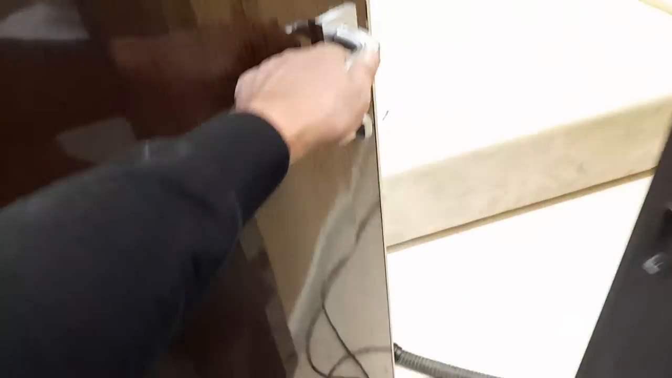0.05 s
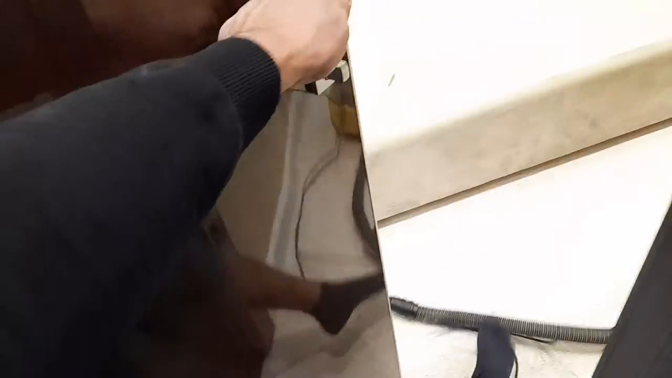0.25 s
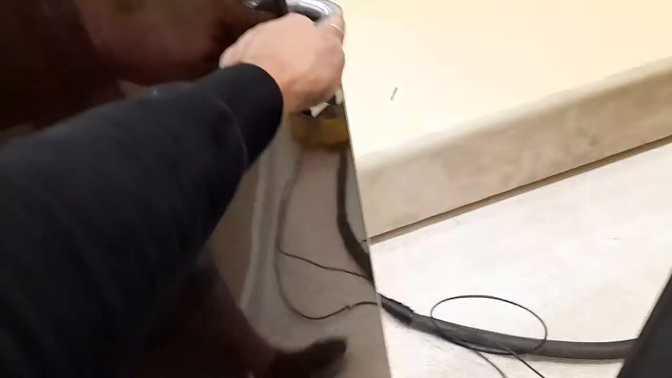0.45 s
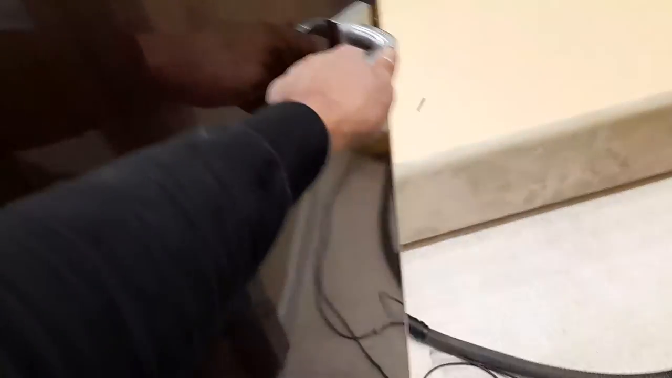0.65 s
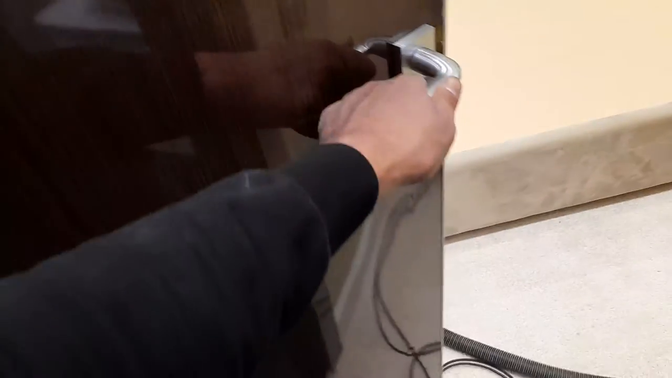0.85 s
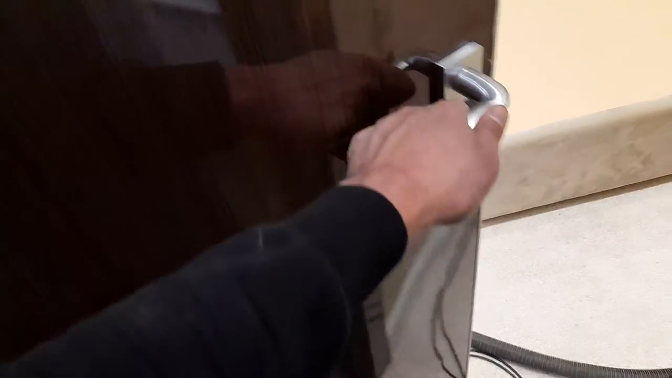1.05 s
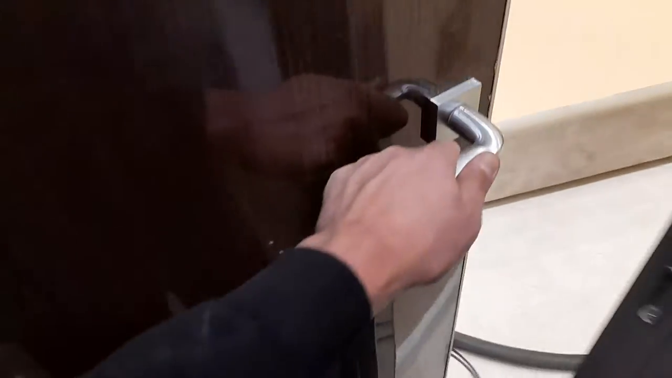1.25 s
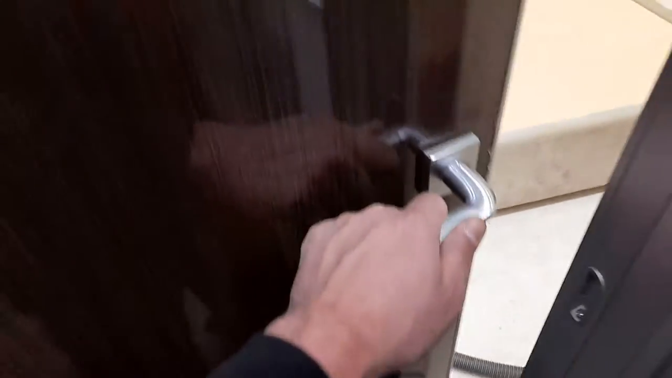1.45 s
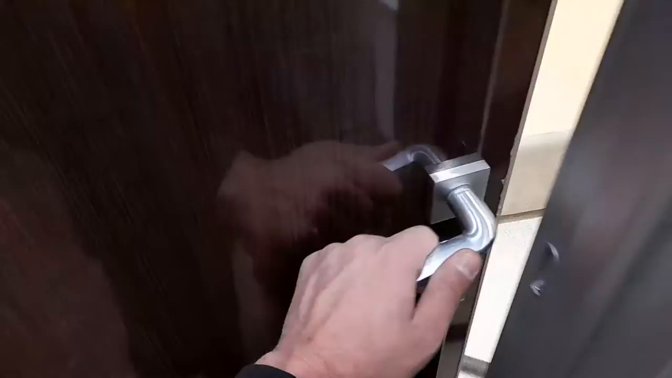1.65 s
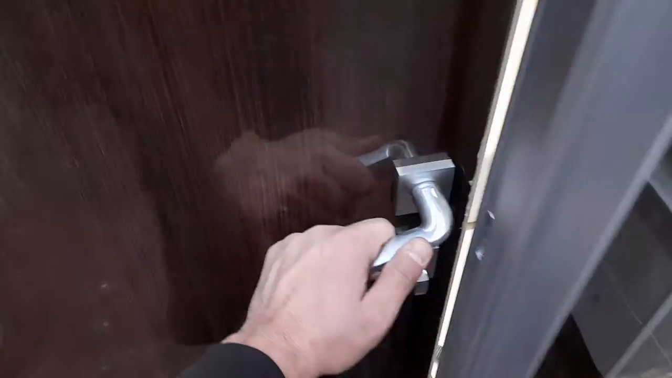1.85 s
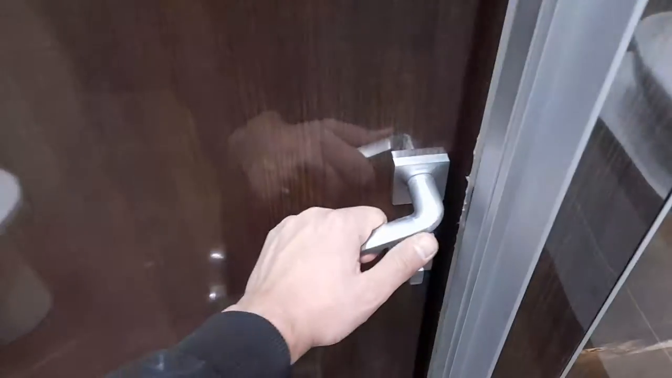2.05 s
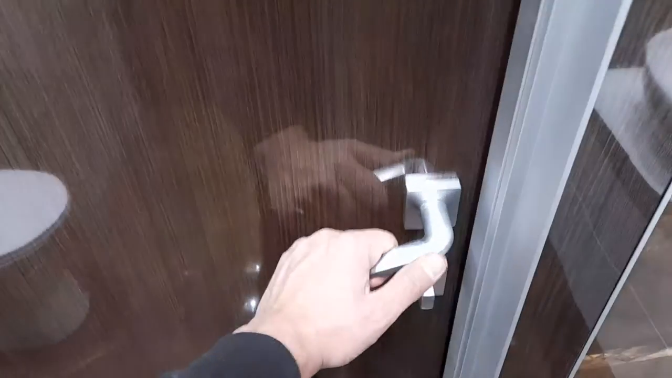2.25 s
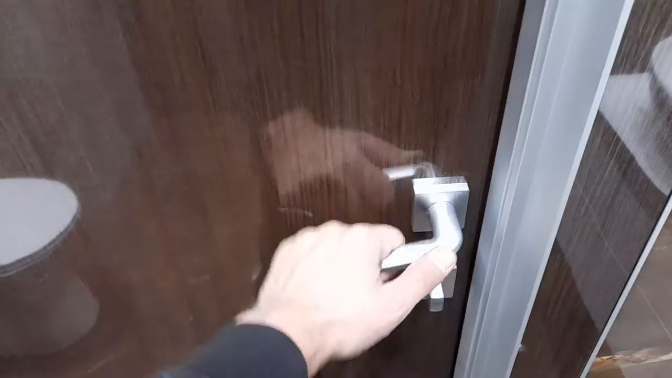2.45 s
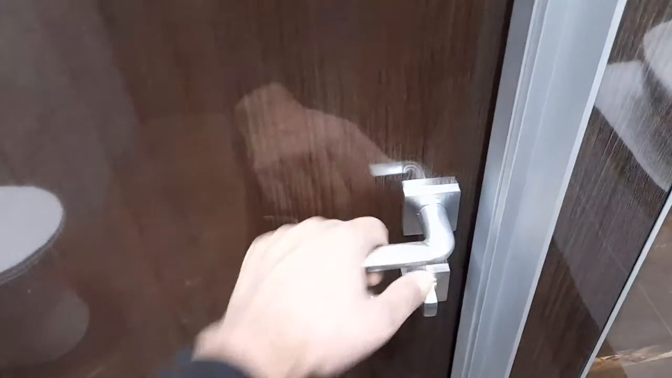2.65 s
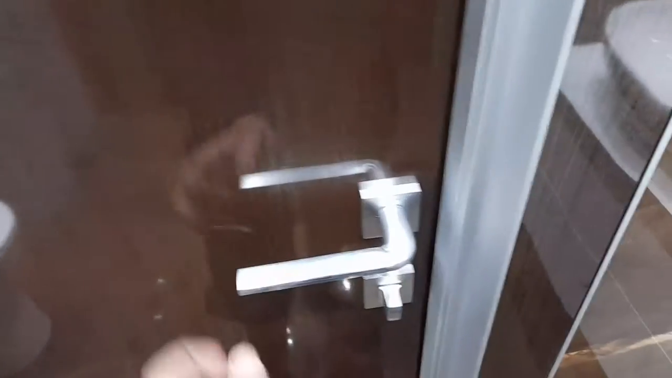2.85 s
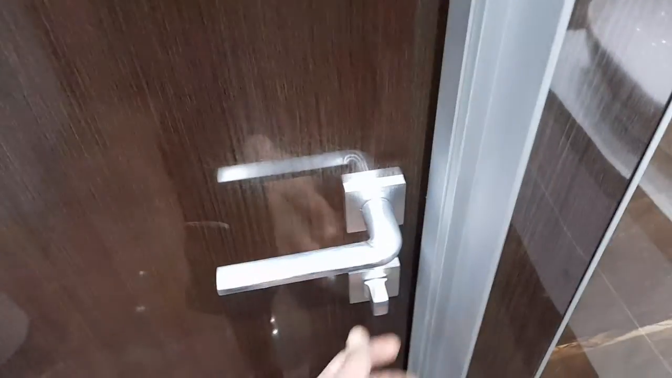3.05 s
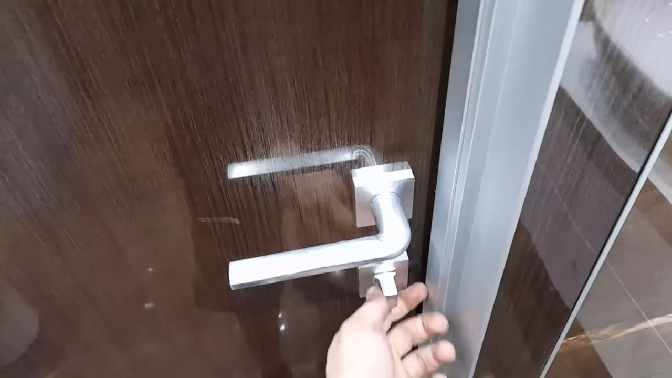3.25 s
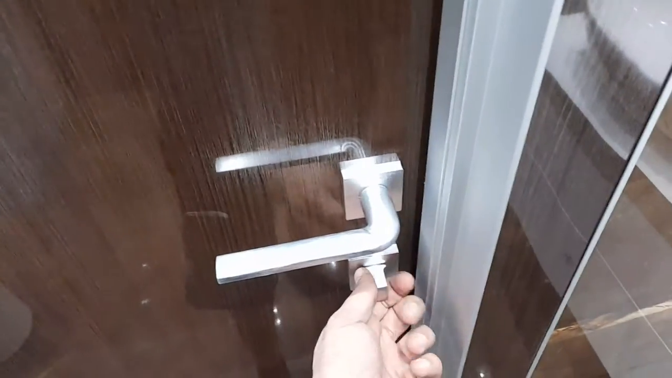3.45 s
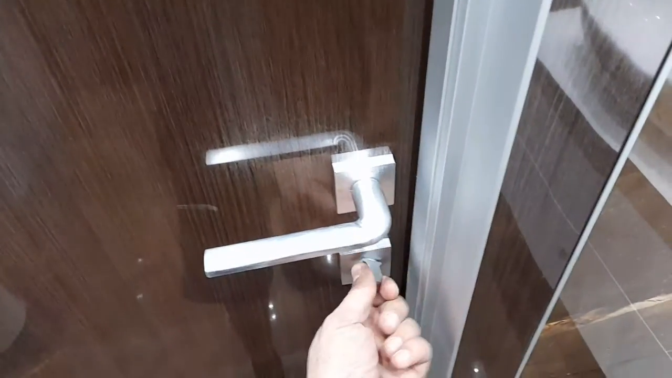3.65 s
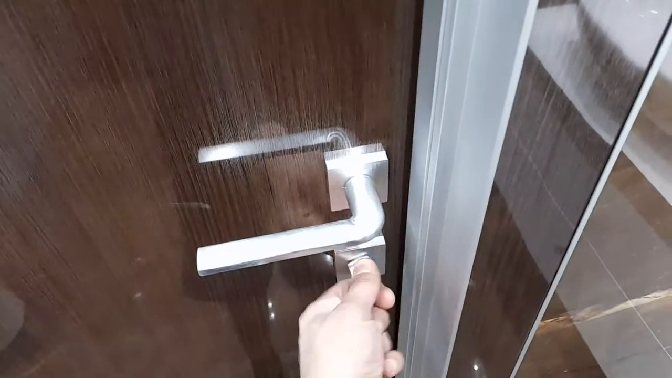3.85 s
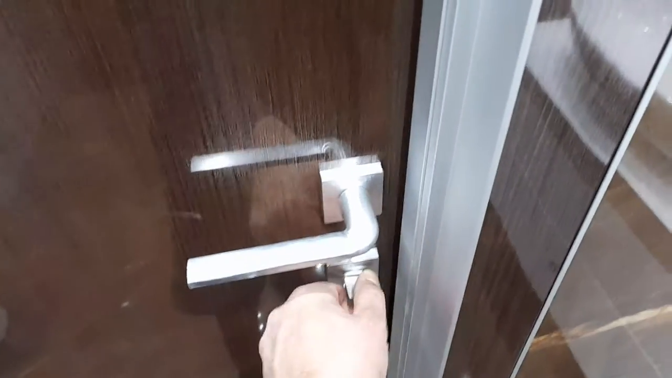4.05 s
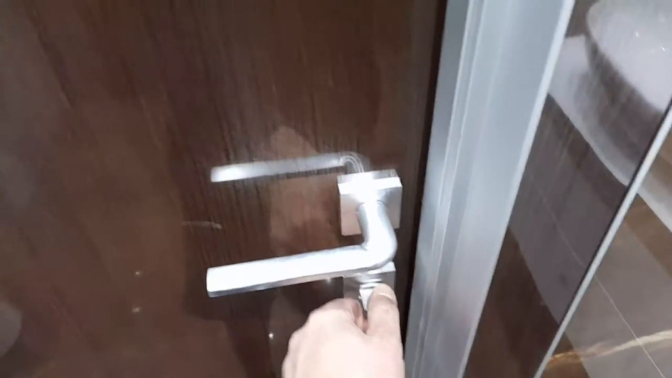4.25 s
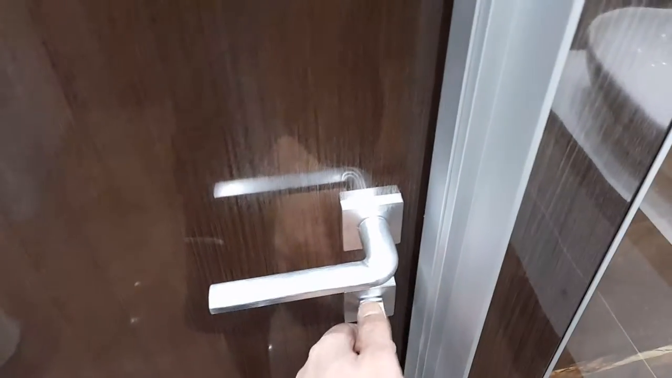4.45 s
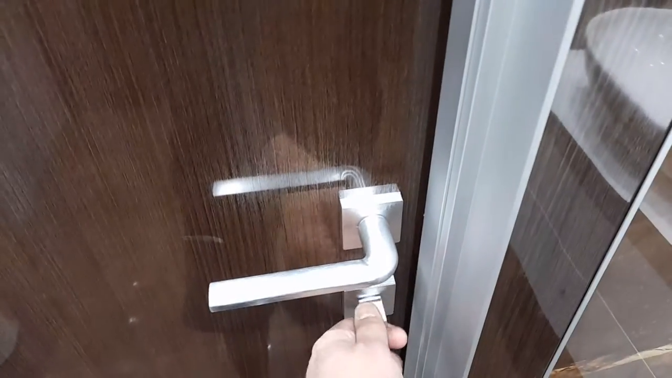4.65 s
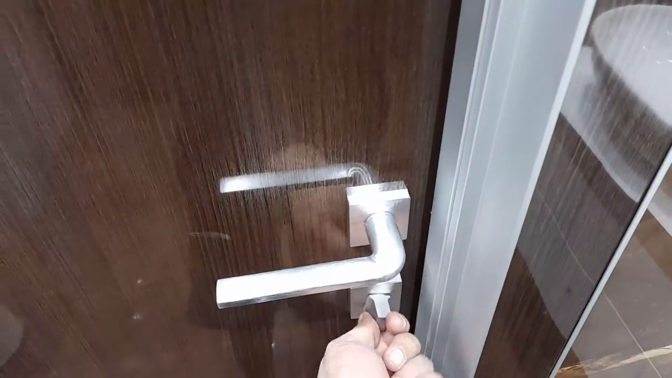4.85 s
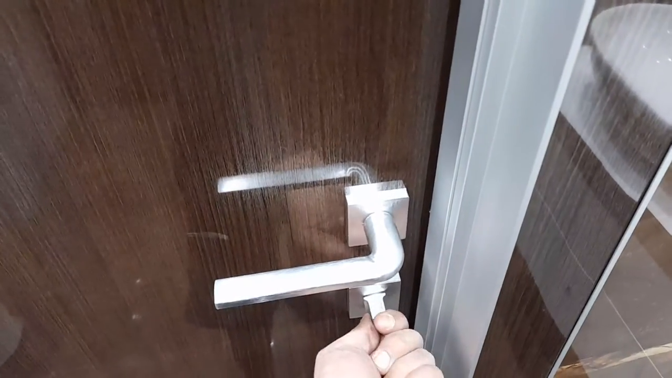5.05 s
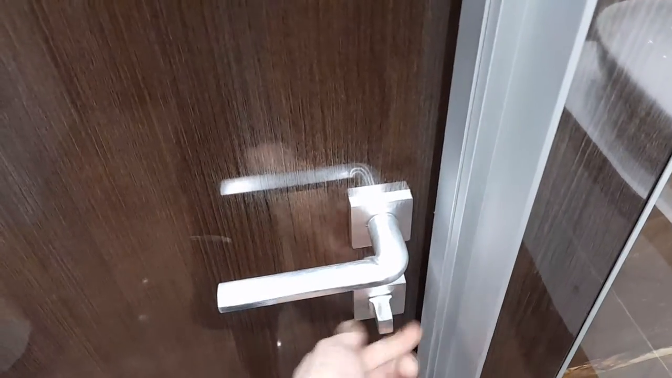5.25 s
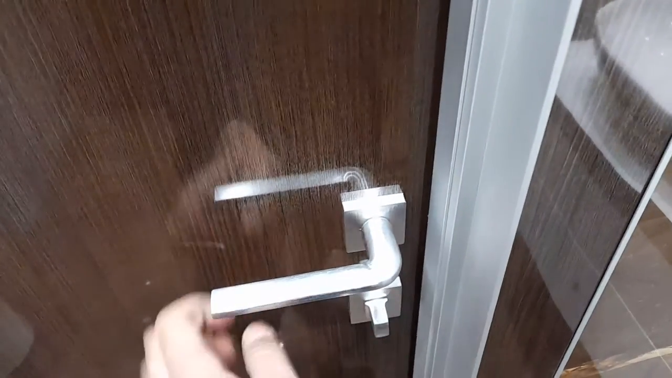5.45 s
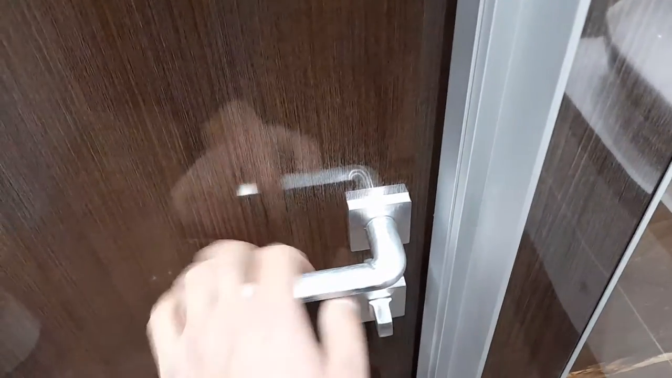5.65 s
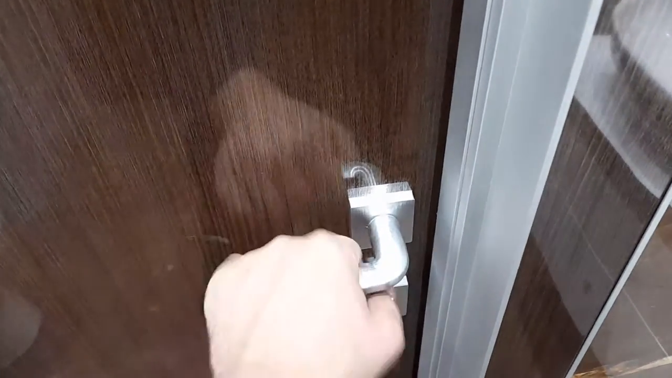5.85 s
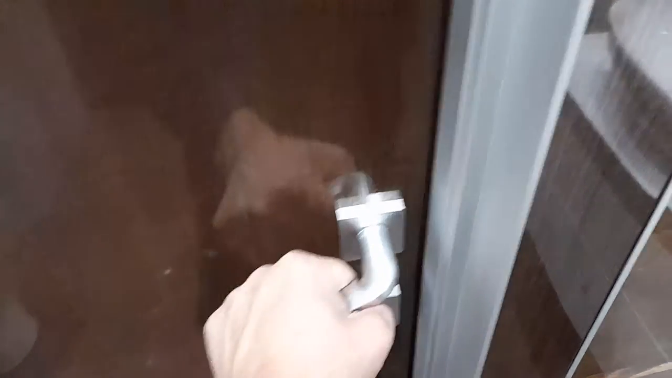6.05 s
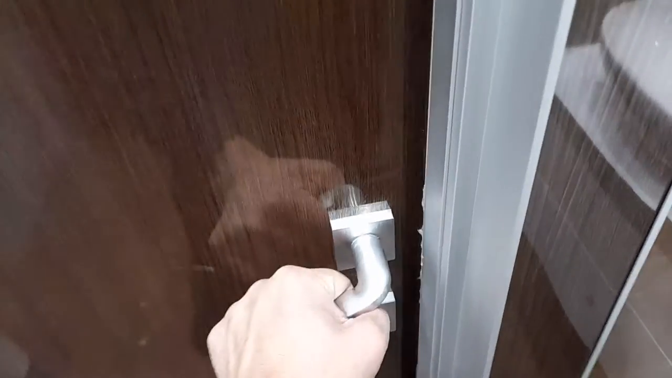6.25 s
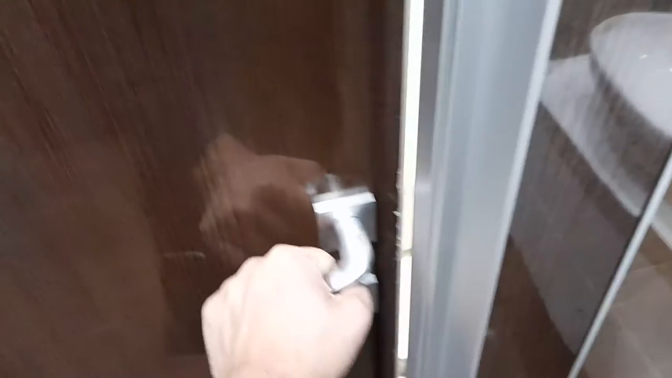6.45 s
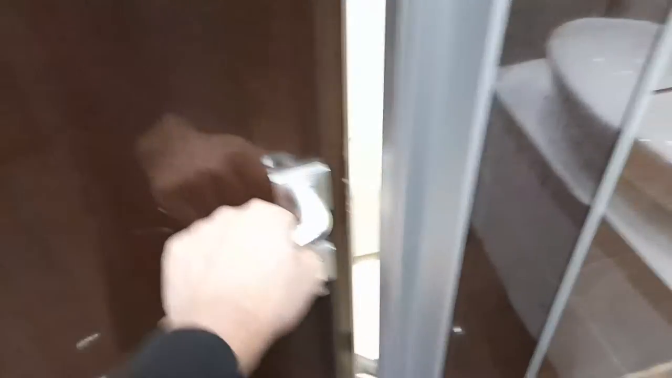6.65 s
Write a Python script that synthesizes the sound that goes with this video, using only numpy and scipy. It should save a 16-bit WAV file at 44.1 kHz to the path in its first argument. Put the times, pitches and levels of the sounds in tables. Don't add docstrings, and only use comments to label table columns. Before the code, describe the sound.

A close stereo microphone hears a wooden door with a metal lever in a small, reverberant, hard-surfaced room with faint hum and hiss. From 0 to 0.4 s there are light metal ticks and skin rubbing on the handle; faint knocks follow around 0.8 and 1.65 s. At about 2.2 s the latch cracks sharply and the door slams with a deep, chesty boom, a low hum and shudder ringing on while the background dulls. Small settling clicks come at 2.9 s. From 3.4 to 3.65 s the thumb-turn lock clacks; a strong double clunk with rattle lands near 3.96 s, a lighter one at 4.36, the hardest snap at 4.72, then a cluster of clicks to 4.93 and one at 5.19. Soft fumbling at 5.5-5.8 s precedes crisp lever clacks at 5.9-6.05 s; the latch frees, and low shudder and handling fade as the door opens.

```python
import sys
import numpy as np
from scipy import signal
from scipy.fft import irfft
from scipy.io import wavfile

SR = 44100
rng = np.random.default_rng(int(sys.argv[2]) if len(sys.argv) > 2 else 0)


def convert_level_to_amplitude(level_db):
    exponent = np.asarray(level_db, float) / 20
    return 10 ** exponent


def master_out(mix):
    frames = np.transpose(np.atleast_2d(mix))
    ceiling = np.clip(frames, -1, 1)
    pcm = np.round(ceiling * 32767).astype(np.int16)
    wavfile.write(sys.argv[1], SR, pcm)


N = 295749

# [f/Hz, level/dB, T60/s]
SLAM_MODES = [(68.7, -15, 0.4), (92, -8, 0.8), (108, -1.5, 0.35), (144.4, -9.5, 0.5), (178, -11, 0.25),
              (220, -19, 0.5), (278.6, -10, 0.35), (319, -26, 0.6), (472, -24, 0.35), (356, -15, 0.2),
              (243.5, -17, 0.4)]
# [f/Hz, shut level/dB, free level/dB, T60/s]
LEAF_MODES = [(64.6, -5.5, -21, 0.45), (99.6, 0.5, 3, 0.17), (111.7, -3, -27, 0.34), (152, -3, -13, 0.18)]
# [f/Hz, shut level/dB, free level/dB, T60/s]
PANEL_MODES = [(193, -13, -5.5, 0.14), (229.5, -9.5, -13, 0.14), (292.5, -6.5, -27, 0.09),
               (315, -7, 3.5, 0.16), (376.5, -5.5, -13, 0.22), (416.5, 6.5, 9, 0.03),
               (482, -16.5, -11.5, 0.56), (528.3, 1, 2.5, 0.099), (599.5, -3.5, -0.5, 0.094),
               (679, -2, -1, 0.032)]
# [f/Hz, level/dB, T60/s]
CASE_MODES = [(805, -7.5, 0.015), (793, -10.5, 0.0079), (980, 2, 0.0084), (1080, -5.5, 0.049),
              (1163, -1.5, 0.011), (1385, -1, 0.02), (1590, -11.5, 0.023)]
# [f/Hz, level/dB, T60/s]
BOLT_MODES = [(1820, 4.5, 0.003), (2235, 3, 0.01), (2600, 5, 0.0037), (3325, 4.5, 0.0041),
              (3850, -6, 0.002)]
# [f/Hz, level/dB, T60/s]
CRACK_MODES = [(4600, 8.16, 0.0013), (5270, 0.72, 0.0069), (6400, 9.6, 0.0015), (7530, 1.87, 0.0016)]
# [f/Hz, level/dB, T60/s]
EDGE_MODES = [(9940, 8.5, 0.0012), (12340, 12, 0.0016), (15000, 11.5, 0.00051)]

# [t/s, case level/dB, hardness/dB, wood level/dB]
SWING = [(0.171, -37.5, -1.5, -45.5), (0.24, -73, 3, -47), (0.349, -56.5, 10, -47), (0.763, -40.5, -1, -40),
         (0.783, -60, 14, -38), (0.89, -44, -17, -44), (0.921, -71, 2, -52), (1.64, -43.5, -10, -39.5),
         (1.646, -42, -19.5, -35), (1.897, -59, -7.5, -51.5), (2.191, -36, -26, -48),
         (2.219, -17.5, -10.5, -24.5)]
# [t/s, case level/dB, hardness/dB, wood level/dB]
SEATED = [(2.254, -54, 21, -23), (2.282, -30, -10, -25), (2.305, -27, -8, -34), (2.345, -37, -26, -36),
          (2.855, -53, -8, -52), (2.913, -41, -8, -50), (2.924, -33, -6, -39), (2.934, -39, -20, -37),
          (2.966, -37, -5, -35.5), (3.23, -43.5, -58, -49), (5.505, -48, -13, -65),
          (5.589, -35.5, -49, -46.5), (5.603, -51.5, 2.5, -43), (5.775, -41, -8.5, -50),
          (5.905, -32, -5, -32), (5.955, -29.5, -6.5, -32.5), (6.051, -25.5, -13, -37),
          (6.083, -33, -42, -41)]
# [t/s, case level/dB, hardness/dB, wood level/dB]
LOCK = [(3.382, -25, -34, -37), (3.435, -29, -38, -44), (3.522, -17, -38, -33.5), (3.552, -20, -10, -31.5),
        (3.645, -24.5, -22, -29.5), (3.944, -25, -17, -35.5), (3.961, -19, -14, -25.5),
        (3.979, -23, -53, -28), (3.998, -35, -26, -37), (4.048, -31.5, -14, -34), (4.089, -57, -5, -33),
        (4.355, -30.5, -66, -45), (4.419, -61, -42, -47.5), (4.659, -23, -30.5, -36.5),
        (4.714, -31, -21, -45), (4.719, -13, -23.5, -32), (4.781, -30, -26, -33), (4.845, -26, -27, -30),
        (4.865, -24, -33, -55), (4.888, -24, -35, -38), (4.933, -39.5, 2.5, -34.5), (5.185, -24, -30, -48),
        (5.219, -58, -14, -42)]
# [t/s, level/dB]
PUSHES = [
    (0.783, -36.5),
    (0.89, -37.5),
    (0.932, -40.5),
    (1.646, -38),
    (4.929, -45),
    (5.121, -50),
    (5.505, -41),
    (5.692, -49),
    (5.775, -39.5),
]

# [t/s, level/dB, f/Hz, width/Hz, T60/s]
CHATTER = [(3.384, -38.5, 1060, 150, 0.16), (3.524, -39, 1170, 203, 0.2), (3.962, -23.5, 1020, 110, 0.14),
           (3.963, -31.5, 2290, 400, 0.13), (3.963, -32.5, 1680, 250, 0.15), (3.964, -31, 3040, 400, 0.08),
           (4.36, -49, 2390, 500, 0.18), (3.556, -38, 2570, 500, 0.069), (3.556, -34.5, 5700, 900, 0.059),
           (3.998, -28, 1030, 150, 0.069), (4.05, -33.5, 1140, 202, 0.2), (4.66, -48, 1050, 146, 0.13),
           (4.721, -29.5, 1240, 130, 0.23), (4.725, -33.5, 2290, 250, 0.19), (4.722, -33, 2970, 500, 0.11),
           (3.645, -29, 1700, 700, 0.03), (5.955, -34, 2600, 900, 0.052), (5.65, -57.5, 5800, 1500, .3),
           (2.97, -47.5, 4660, 1500, 0.17), (4.765, -31.5, 1310, 150, 0.092),
           (4.811, -38, 1170, 150, 0.087), (4.86, -27.5, 895, 250, 0.048), (4.885, -36, 1280, 250, 0.038),
           (5.186, -30.5, 1080, 160, 0.1), (5.185, -38.5, 1390, 250, 0.16),
           (5.186, -36.5, 2900, 800, 0.079), (5.186, -50, 1920, 400, 0.067),
           (5.186, -56, 4100, 1200, 0.047), (6.052, -34, 2600, 700, 0.083), (6.052, -37, 4460, 400, 0.077),
           (5.905, -38.5, 3360, 900, 0.041), (0.889, -43, 840, 300, 0.031), (1.643, -59, 5200, 1500, 0.089),
           (2.222, -39, 1090, 120, 0.091)]
# [t/s, level/dB, f/Hz, width/Hz, T60/s]
MORE_CHATTER = [(2.221, -29, 4200, 1400, 0.07), (2.255, -34, 4300, 1400, 0.15), (2.306, -38, 4300, 1200, 0.25),
                (2.255, -38, 7100, 900, 0.1), (2.26, -35, 1750, 500, 0.2), (2.914, -40, 4400, 1600, 0.015),
                (2.922, -40, 2300, 500, 0.08), (4.358, -45, 1130, 260, 0.15), (3.963, -31.5, 2450, 400, 0.15),
                (5.776, -49, 2700, 1600, 0.06), (5.78, -61, 5900, 1500, 0.4), (5.9, -42, 3800, 2000, 0.012),
                (6.049, -38, 2600, 1500, 0.012), (0.2, -50, 2900, 300, 0.1), (0.196, -42, 6600, 1200, 0.01),
                (0.241, -35, 5200, 2000, 0.012), (0.331, -40, 4500, 1500, 0.01), (3.553, -44, 12200, 2500, 0.1),
                (5.596, -52, 3500, 2000, 0.012), (6.053, -40, 1550, 400, 0.2), (5.955, -36, 1600, 700, 0.03),
                (4.662, -41, 760, 250, 0.12), (3.645, -25, 1500, 900, 0.02)]
# [t/s, level/dB, f/Hz, width/Hz, T60/s]
SHUDDER = [(2.37, -26, 164, 75, 0.42), (2.265, -25, 316, 120, 0.38), (2.44, -32.5, 95, 25, 0.57),
           (1.66, -44, 397, 67, 0.61), (5.6, -46, 375, 22, .5), (0.39, -58, 65, 25, .2),
           (0.13, -56.5, 157, 51, 0.76), (2.364, -31.5, 486, 180, 0.27), (2.265, -36, 760, 290, 0.35),
           (2.34, -39.5, 1020, 470, 0.19), (2.45, -34, 325, 42, 0.37), (4.96, -51, 50, 16, .45),
           (3.962, -44, 57, 20, 0.28), (4.54, -62, 100, 25, .15), (4.4, -53, 39, 13, 0.24),
           (2.905, -36, 167, 65, 0.34), (4.98, -45.5, 220, 120, 0.6), (4.36, -53.5, 197, 100, 0.25),
           (5.956, -32.5, 354, 90, 0.2), (6.05, -35, 480, 120, 0.19), (6.069, -39, 60, 15, .3),
           (6.28, -44.5, 257, 76, 0.43), (6.38, -53.5, 470, 140, 0.3), (6.58, -69.5, 260, 25, .15)]

# [t/s, peak level/dB, f/Hz, snap level/dB]
TICKS = [(0.173, -19, 4000, -33), (0.1957, -39, 2860, -29), (0.2413, -29, 4170, -24.5),
         (0.333, -31, 1150, -36), (0.172, -22, 2910, -53), (0.241, -26, 1330, -48),
         (0.349, -28.5, 1420, -50), (0.347, -25.5, 3920, -50), (0.35, -27, 3270, -35),
         (0.7646, -36, 1800, -45), (0.7656, -25, 4700, -40), (2.856, -55, 2080, -55),
         (2.925, -28.5, 2263, -38), (2.9671, -28, 2800, -34), (3.382, -24, 1580, -48),
         (3.521, -21, 1440, -68), (3.5538, -28, 2540, -21), (3.648, -24.5, 1860, -60),
         (3.9618, -33, 2480, -21), (3.9796, -14.5, 1990, -38), (4.0522, -19, 2070, -85),
         (4.359, -26, 2380, -67), (4.7202, -13, 2200, -26), (4.86, -25, 1590, -51), (4.934, -58, 3100, -38),
         (5.1851, -23, 2600, -57), (5.59, -54, 2280, -36), (5.6027, -37, 1540, -33),
         (5.776, -40, 2930, -38), (5.902, -22, 2840, -46), (5.905, -15, 3000, -28), (5.954, -27, 3500, -31),
         (5.9555, -17, 4890, -50), (6.052, -10, 2330, -45), (6.0568, -23, 2700, -47)]
# [t/s, peak level/dB, f/Hz]
KNOCKS = [(0.763, -39, 341), (0.888, -38, 327), (0.889, -56, 910), (0.903, -38, 363), (0.914, -43, 600),
          (0.922, -42, 339), (0.923, -45, 812), (1.014, -44.5, 316), (1.642, -36, 401), (1.643, -49, 710),
          (2.193, -41, 1080), (2.261, -39, 840), (2.915, -37.5, 717), (3.229, -49, 321), (3.229, -48, 774),
          (2.97, -29, 373), (3.384, -37.5, 379), (3.556, -30.5, 370.5), (4.662, -34, 395),
          (4.723, -35.5, 380), (4.78, -25.5, 370.3), (4.848, -30, 379), (5.61, -38.5, 315),
          (5.904, -31.5, 715), (5.955, -31, 738)]

# [t/s, length/s, rumble level/dB, rub level/dB]
HANDLING = [(0.0, 0.31, -54.5, -44), (0.58, 0.055, -67, -59.5), (0.68, 0.026, -57.5, -64),
            (0.76, 0.17, -56.5, -52), (1.68, 0.048, -43.5, -53), (1.85, 0.51, -56.5, -61.5),
            (2.62, 0.008, -43.5, -50.5), (2.88, 0.11, -42, -53.5), (4.652, 0.0042, -44, -65),
            (5.46, 0.14, -54, -61.5), (5.66, 0.12, -50, -61), (5.79, 0.046, -56, -53),
            (5.9, 0.083, -36, -50), (6.13, 0.14, -44, -70), (6.32, 0.086, -46.5, -83),
            (6.56, 0.036, -73.5, -63.5)]
# [t/s, length/s, level/dB]
SQUEAK = [
    (2.11, 0.07, -66),
    (2.83, .07, -67),
    (6.05, .01, -57),
]
# [t/s, length/s, level/dB]
BRUSH = [
    (0.12, 0.2, -60),
    (1.93, 0.05, -74),
    (2.17, 0.03, -70),
    (2.68, 0.055, -64.5),
    (4.94, 0.054, -71),
    (5.645, 0.03, -60),
    (5.8, 0.03, -66),
    (5.87, 0.02, -64),
]
# [f/Hz, level/dB per Hz]
RUMBLE = [(24, -67), (40, 5), (75, -4), (124, -4.5), (286, 4.5), (357, -4.5), (541, -10.5), (609, -23),
          (900, -17), (1170, -43), (1980, -120)]
# [f/Hz, level/dB per Hz]
RUB = [(350, -42), (600, 0), (953, -3.5), (1340, -2.5), (1730, -2), (3660, -6.5), (6150, -1.5), (8180, -24),
       (12800, 4.5), (15500, -14)]

# [f/Hz, T60/s, level/dB, build-up/s, left-right likeness, left-right level/dB]
ROOM = [(60, 0.6, -30.5, 0.036, 0.2, -0.5), (250, 0.85, -30.5, 0.021, 0.84, -1.5),
        (600, 0.55, -26.5, 0.0055, 0.34, 0.5), (1300, 0.95, -27.5, 0.0011, -0.23, -2.5),
        (2600, 0.8, -28, 0.0011, 0.057, -3.5), (5200, 0.77, -30.5, 0.00043, -0.18, -6),
        (9000, 0.53, -29.5, 0.0035, -0.15, 0.5), (13600, 0.58, -33, 0.0019, -0.0039, 0)]
# [f/Hz, level/dB per Hz]
FLOOR = [(18, -37), (30, -23), (90, 8), (170, -5), (384, 1), (554, -10.5), (1160, -13.5), (1760, -10),
         (3400, -15), (5740, -4), (8520, -21), (13000, -12), (16000, -11.5)]
# one row per channel, left then right [level/dB]
MIC_TREBLE_DB = [
    [-15.5],
    [-21.5],
]
EDGES = 32 * 2 ** np.arange(0, 9.1, .5)
EVEN_ECHOES = np.exp(2j * np.pi * rng.random((2, 2, 10, int(.15 * SR) // 2 + 1)))

SLAM_S, SLAM_DB, SLAM_PUSH_S = 2.257, -10.5, 0.006
OPENS_S = 6.07
HUM_HZ, HUM_DB, HUM_LAG_S, HUM_HOLD_S, HUM_T60_S = 58.2, -15.5, 0.0052, 0.11, 1.0
HUM_WOBBLE_HZ, HUM_WOBBLE_DB = 8.3, 1
LOCK_SPAN_S, LOCK_EDGE_DB = (3.3, 5.0), 7.5
BOLT_HARDNESS_SHARE, LEVER_BOLT_DB, LOCK_BOLT_DB = 0.25, 0.5, -1.5
SWING_LEAF_DB, SEATED_LEAF_DB, LOCK_LEAF_DB = -17, 1.5, -12
CASE_SMALL_HZ = 840
CHATTER_PER_CYCLE, SHUDDER_PER_CYCLE, CHATTER_RISE_CYCLES = .3, 3, 1.34
TICK_T60_S, KNOCK_CYCLES = 0.012, 92
OVERTONE_RATIO, OVERTONE_DB, OVERTONE_LIFE = 1.286, -10.5, 0.22
GRIP_DB_PER_S, LET_GO_DB_PER_S = 384, 223
SQUEAK_HZ, SQUEAK_T60_S, SQUEAK_RISE_DB_PER_S, SQUEAK_FALL_DB_PER_S = 2170, .01, 314, 246
BRUSH_HZ, BRUSH_RISE_DB_PER_S, BRUSH_FALL_DB_PER_S = 10000, 154, 132
OPEN_DECAY = 1.34
FLOOR_DB, SHUT_QUIET_DB = -69.5, -9
MIC_BASS_HZ, MIC_KNEE_HZ, TOP_HZ = 35.6, 7600, 16000


def slam():
    t = np.maximum(np.arange(N) / SR - SLAM_S, 0)
    shove = t / SLAM_PUSH_S * np.exp(-t / SLAM_PUSH_S) * (t < .3)
    boom = 0
    for hz, level_db, t60 in SLAM_MODES:
        drive = shove / shove.sum() * 2 * np.cos(2 * np.pi * hz * t - 0.5 * rng.random())
        boom = boom + convert_level_to_amplitude(level_db) * ring(drive, hz, t60)
    held = t - HUM_HOLD_S
    hum_db = HUM_DB - 60 * np.maximum(held, 0) / HUM_T60_S
    hum_db = hum_db + HUM_WOBBLE_DB * np.cos(2 * np.pi * HUM_WOBBLE_HZ * held)
    hum = convert_level_to_amplitude(hum_db) * np.sin(2 * np.pi * HUM_HZ * np.maximum(t - HUM_LAG_S, 0))
    return convert_level_to_amplitude(SLAM_DB) * boom + hum


def ring(clicks, hz, t60):
    r, w = convert_level_to_amplitude(-60 / (t60 * SR)), 2 * np.pi * hz / SR
    return signal.lfilter([0, np.sin(w)], [1, -2 * r * np.cos(w), r * r], clicks + 1e-18)


def hardware():
    s, case_db, hardness_db, panel_db = contacts()
    locking = (s > LOCK[0][0] - .1) & (s < LOCK[-1][0] + .1)
    bolt_db = case_db + np.where(locking, LOCK_BOLT_DB, LEVER_BOLT_DB) + BOLT_HARDNESS_SHARE * hardness_db
    crack_db = case_db + hardness_db
    bare = (s > LOCK_SPAN_S[0]) & (s < LOCK_SPAN_S[1]) | (abs(s - SLAM_S) < .06)
    edge_db = crack_db - 1.5 + LOCK_EDGE_DB * bare
    counts = [len(SWING), len(SEATED), len(LOCK), len(PUSHES)]
    leaf_db = panel_db + np.repeat([SWING_LEAF_DB, SEATED_LEAF_DB, LOCK_LEAF_DB, 30], counts)

    case = rattled(CASE_MODES, case_db - 8, 0.0091, rattle_db=-6.0)
    too_small_for_bass = signal.butter(2, CASE_SMALL_HZ, "high", fs=SR, output="sos")
    case = signal.sosfilt(too_small_for_bass, case)
    bolt = rattled(BOLT_MODES, bolt_db - 2, 0.0011, rattle_db=-5.5)
    crack = rattled(CRACK_MODES, crack_db + 2.0, 0.0019, rattle_db=-3.5)
    crack = crack + rattled(EDGE_MODES, edge_db, 0.0046, rattle_db=-1.5)
    leaf = struck(LEAF_MODES, leaf_db - 7.0, 0.018, spread_db=3.5)
    panel = struck(PANEL_MODES, panel_db - 8.5, 0.0016, spread_db=-1.0)
    return case + bolt, crack, leaf + panel


def contacts():
    shoves = [(s, -99, 0, db - 30) for s, db in PUSHES]
    return np.transpose(SWING + SEATED + LOCK + shoves)


def struck(modes, blow_db, contact_s, spread_db):
    s, out = contacts()[0], np.zeros(N)
    shut = (s > SLAM_S - .1) & (s < OPENS_S)
    chance = rng.standard_normal((len(s), len(modes), 2))
    r = np.exp(-1 / (contact_s * SR))
    for k, (hz, shut_db, free_db, t60) in enumerate(modes):
        clicks = np.zeros(N)
        strength_db = blow_db + np.where(shut, shut_db, free_db) + spread_db * chance[:, k, 0]
        clicks[(s * SR).astype(int)] = convert_level_to_amplitude(strength_db) * np.sign(chance[:, k, 1])
        swell = signal.lfilter([1 - r], [1, -r * np.exp(2j * np.pi * hz / SR)], clicks + 1e-18).real
        out += ring(2 * swell, hz, t60)
    return out


def rattled(modes, blow_db, rattle_s, rattle_db):
    starts = np.zeros(N)
    starts[((contacts()[0] + .0012) * SR).astype(int)] = convert_level_to_amplitude(blow_db)
    dying = signal.lfilter([1], [1, -np.exp(-1 / (rattle_s * SR))], starts + 1e-18)
    dying = dying / np.sqrt(rattle_s * SR / 2)
    drive = starts + convert_level_to_amplitude(rattle_db) * dying * rng.standard_normal(N)
    out = 0
    for k, (hz, level_db, t60) in enumerate(modes):
        out = out + (-1) ** k * convert_level_to_amplitude(level_db) * ring(drive, hz, t60)
    return out


def chatter(rows, per_cycle):
    out, t = np.zeros(N), np.arange(int(.6 * SR)) / SR
    for s, level_db, hz, width_hz, t60 in rows:
        taps = (rng.random(len(t)) < per_cycle * hz / SR) * rng.standard_normal(len(t))
        taps[0] = 1
        force = convert_level_to_amplitude(-60 * t / t60) * (1 - np.exp(-(t + 1 / hz) * hz / CHATTER_RISE_CYCLES))
        around = signal.butter(1, [hz / 1.4, hz * 1.4], "band", fs=SR, output="sos")
        taps = signal.sosfilt(around, taps * force)
        ring_t60 = np.log(1000) / (np.pi * width_hz)
        sound = rms_one(ring(taps, hz, ring_t60)) * np.sqrt(np.mean(force ** 2))
        part = out[int(s * SR):][:len(t)]
        part += convert_level_to_amplitude(level_db) * sound[:len(part)]
    return out


def ticks():
    out, size = np.zeros(N), 5000
    rows = [(s, db, hz, TICK_T60_S, snap_db) for s, db, hz, snap_db in TICKS]
    rows += [(s, db, hz, KNOCK_CYCLES / hz, db - 30.0) for s, db, hz in KNOCKS]
    t = np.arange(size) / SR
    grits = rng.standard_normal((len(rows), size + 1))
    for (s, peak_db, hz, t60, snap_db), grit in zip(rows, grits):
        tone = convert_level_to_amplitude(peak_db - 5.5 - 60 * t / t60) * np.sin(2 * np.pi * hz * t)
        tone *= (1 + 0.037 * grit[1:]) * (1 - np.exp(-t / 0.00037))
        overtone_db = peak_db + OVERTONE_DB - 60 * t / (t60 * OVERTONE_LIFE)
        overtone = convert_level_to_amplitude(overtone_db) * np.sin(2 * np.pi * hz * OVERTONE_RATIO * t)
        snap = convert_level_to_amplitude(snap_db + 3.0) * np.diff(grit) * np.exp(-t / 0.0003)
        out[int(s * SR):][:size] += tone + overtone + snap
    return out


def handling():
    rumble, rub = stroked(HANDLING, GRIP_DB_PER_S, LET_GO_DB_PER_S) * convert_level_to_amplitude([[-8], [-9]])
    squeal = rms_one(ring(rng.standard_normal(N), SQUEAK_HZ, SQUEAK_T60_S))
    squeak = stroked(SQUEAK, SQUEAK_RISE_DB_PER_S, SQUEAK_FALL_DB_PER_S)[0] * convert_level_to_amplitude(1.0) * squeal
    rumble = rumble * friction(RUMBLE, 900, uneven_db=0.5)
    rub = rub * friction(RUB, 5000, uneven_db=-3.5)
    return rumble + rub + squeak


def friction(spectrum, per_s, uneven_db):
    slips = (rng.random((2, N)) < per_s / SR) * rng.standard_normal((2, N))
    slips = slips * convert_level_to_amplitude(uneven_db * np.minimum(rng.exponential(1, (2, N)), 4))
    return rms_one(sum(convert_level_to_amplitude(at_hz(spectrum, hz)[0]) * band for hz, band in bands(slips + 1e-18)))


def stroked(strokes, rise_db_per_s, fall_db_per_s):
    t, gains = np.arange(N) / SR, 0
    for s, length_s, *levels_db in strokes:
        loss_db = rise_db_per_s * np.maximum(s - t, 0) + fall_db_per_s * np.maximum(t - s - length_s, 0)
        gains = gains + convert_level_to_amplitude(np.array(levels_db))[:, None] * convert_level_to_amplitude(-loss_db)
    return gains


def brush():
    airy = signal.butter(4, BRUSH_HZ, "high", fs=SR, output="sos")
    hiss = signal.sosfilt(airy, rng.standard_normal((2, N)))
    gain = stroked(BRUSH, BRUSH_RISE_DB_PER_S, BRUSH_FALL_DB_PER_S)[0]
    return gain * rms_one(hiss) * convert_level_to_amplitude([[2.2], [-2.2]])


def room(x):
    t, shut, ajar = np.arange(int(1.5 * SR)) / SR, 0, 0
    scatter = rms_one(irfft(EVEN_ECHOES, len(t) // 10).reshape(2, 2, -1))
    for hz, pair in bands(scatter):
        t60, level_db, build_s = at_hz(ROOM, hz)[:3]
        echo = stereo(pair, hz) * convert_level_to_amplitude(level_db - 60 * t / t60) * (1 - np.exp(-(t / build_s) ** 2))
        shut = shut + echo
        ajar = ajar + echo * convert_level_to_amplitude(-60 * (OPEN_DECAY - 1) * t / t60)
    closed = np.arange(N) / SR > SLAM_S - .1
    wet = signal.fftconvolve([x * closed], shut, axes=1) + signal.fftconvolve([x * ~closed], ajar, axes=1)
    return wet[:, :N]


def stereo(pair, hz):
    alike, pan_db = at_hz(ROOM, hz)[3:]
    alike = np.clip(alike, -1, 1)
    spread = np.sqrt(1 + alike) * pair[0] + np.sqrt(1 - alike) * pair[1] * [[1], [-1]]
    return spread * convert_level_to_amplitude([[pan_db / 2], [-pan_db / 2]])


def bands(x):
    for k, (low, high) in enumerate(zip(EDGES, EDGES[1:])):
        slice_filter = signal.butter(2, [low, high], "band", fs=SR, output="sos")
        yield np.sqrt(low * high), signal.sosfilt(slice_filter, x[k % 2])


def at_hz(points, hz):
    return [np.interp(np.log(hz), np.log(np.array(points)[:, 0]), c) for c in np.transpose(points)[1:]]


def rms_one(x):
    return x / np.sqrt(np.mean(x ** 2) + 1e-20)


def quiet():
    shut = np.interp(np.arange(N) / SR, [SLAM_S - .1, SLAM_S, OPENS_S, OPENS_S + .3], [0, 1, 1, 0])
    outside, own = 0, 0
    for hz, pair in bands(rng.standard_normal((2, 2, N))):
        part = convert_level_to_amplitude(at_hz(FLOOR, hz)[0]) * stereo(pair, hz)
        if hz < MIC_KNEE_HZ:
            outside = outside + part
        else:
            own = own + part
    return convert_level_to_amplitude(FLOOR_DB) * (convert_level_to_amplitude(SHUT_QUIET_DB * shut) * outside + own) / np.std(outside + own)


def scene():
    metal, crack, wood = hardware()
    boom, hand, tick = slam(), handling(), ticks()
    loose = chatter(CHATTER, CHATTER_PER_CYCLE) + chatter(MORE_CHATTER, CHATTER_PER_CYCLE)
    shake = chatter(SHUDDER, SHUDDER_PER_CYCLE)

    direct = metal * convert_level_to_amplitude([[-1.2], [1.2]]) + crack * convert_level_to_amplitude([[1.5], [-1.5]]) + wood * convert_level_to_amplitude([[.2], [-.2]])
    direct = direct + boom * convert_level_to_amplitude([[-.6], [.6]]) + hand + tick * convert_level_to_amplitude([[.5], [-.6]])
    direct = direct + loose * convert_level_to_amplitude([[-.7], [.7]]) + shake

    send = metal + convert_level_to_amplitude(1.5) * crack + convert_level_to_amplitude(-0.5) * wood + convert_level_to_amplitude(-12.0) * boom + convert_level_to_amplitude(-11.5) * tick
    send = send + convert_level_to_amplitude(-1.0) * hand + convert_level_to_amplitude(-6.5) * loose + convert_level_to_amplitude(-6.5) * shake

    near = direct + room(send)
    below = signal.sosfilt(signal.butter(10, MIC_KNEE_HZ, fs=SR, output="sos"), near)
    above = signal.sosfilt(signal.butter(10, MIC_KNEE_HZ, "high", fs=SR, output="sos"), near)
    return below - convert_level_to_amplitude(MIC_TREBLE_DB) * above + brush() + quiet()


def low_pass(x):
    return signal.sosfilt(signal.butter(12, 16640, fs=SR, output="sos"), x)


def record(dry):
    dry = signal.sosfilt(signal.butter(4, MIC_BASS_HZ, "high", fs=SR, output="sos"), dry)
    low = signal.sosfiltfilt(signal.butter(12, TOP_HZ, fs=SR, output="sos"), dry)
    return low_pass(low + convert_level_to_amplitude(-44) * (dry - low))


dry = scene()
out = record(dry)
master_out(out)
```